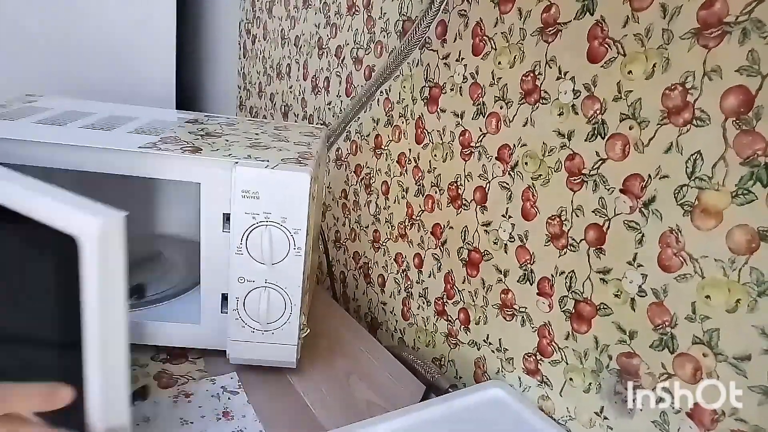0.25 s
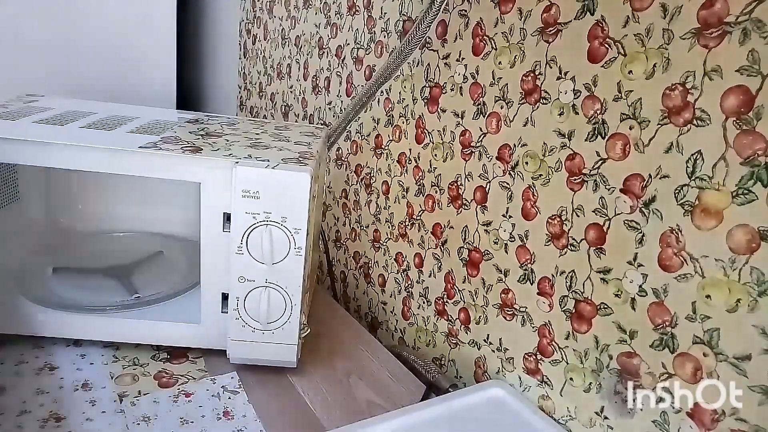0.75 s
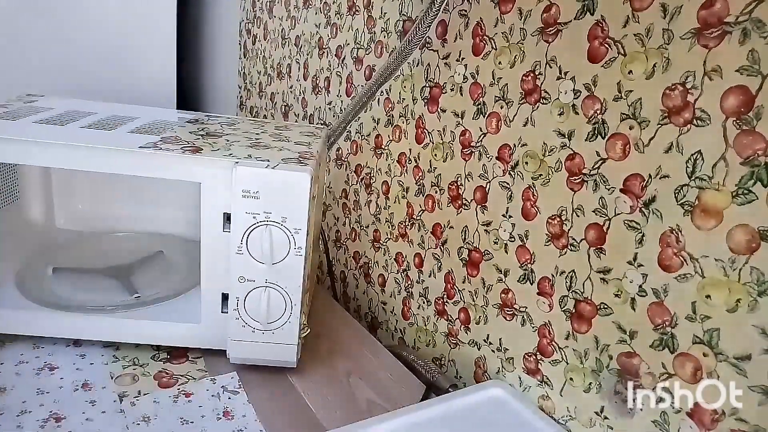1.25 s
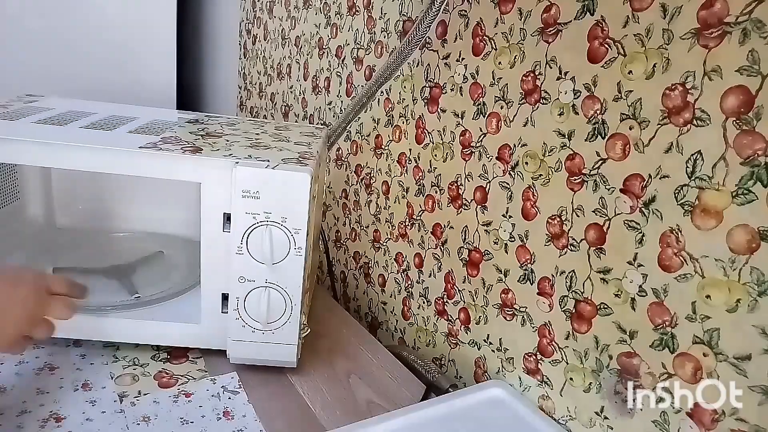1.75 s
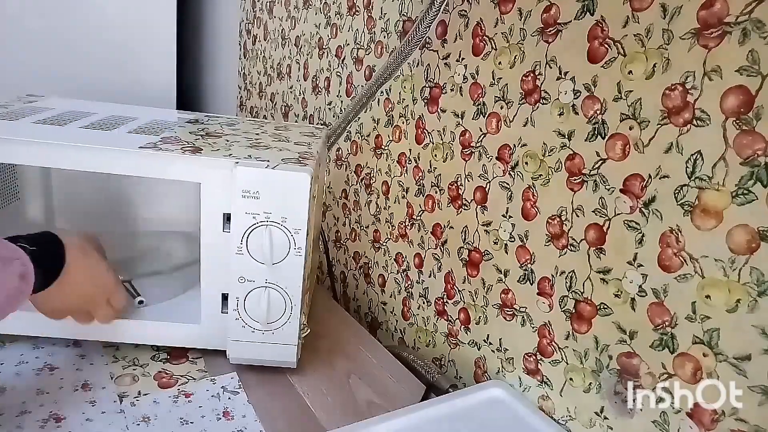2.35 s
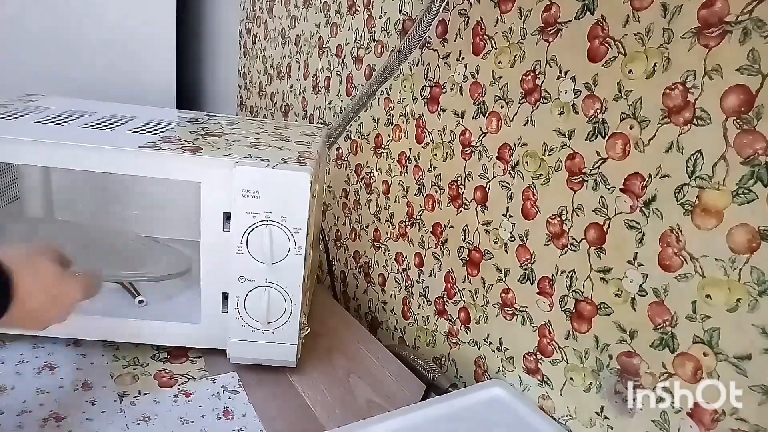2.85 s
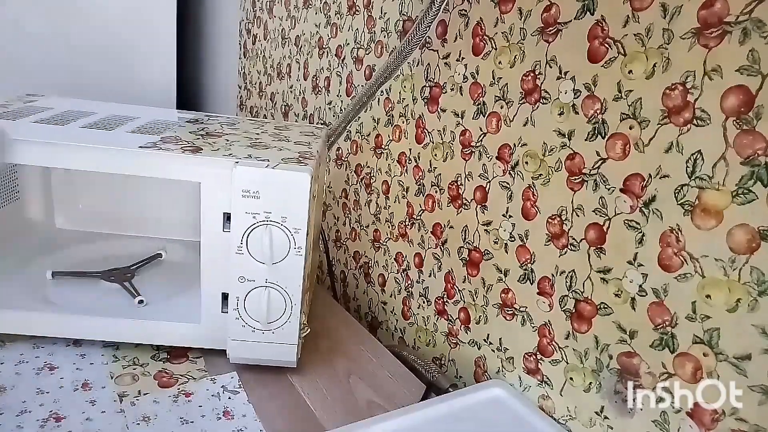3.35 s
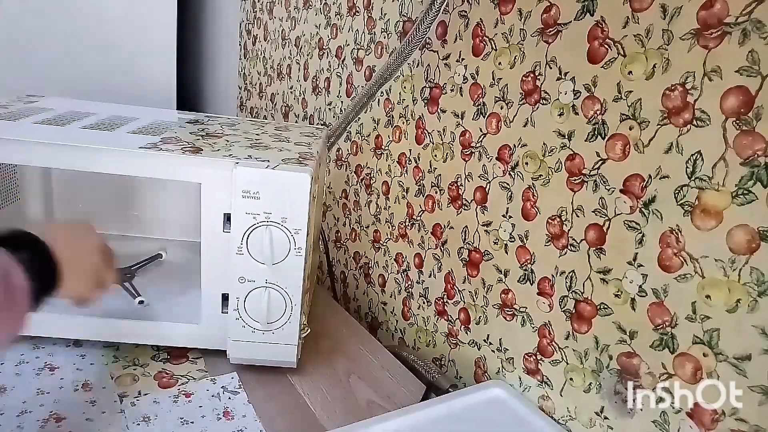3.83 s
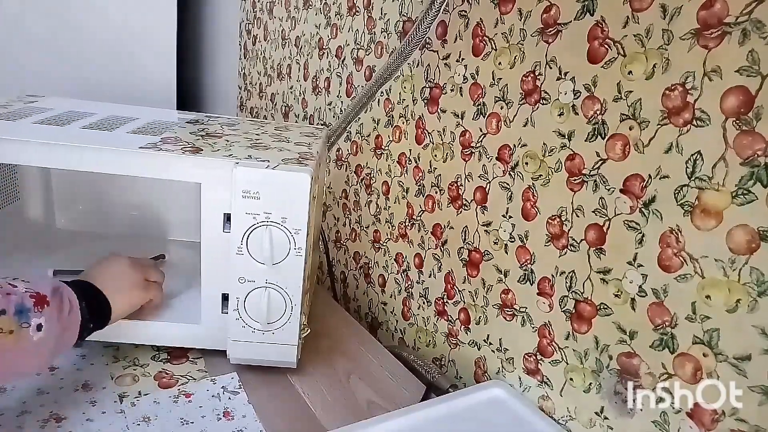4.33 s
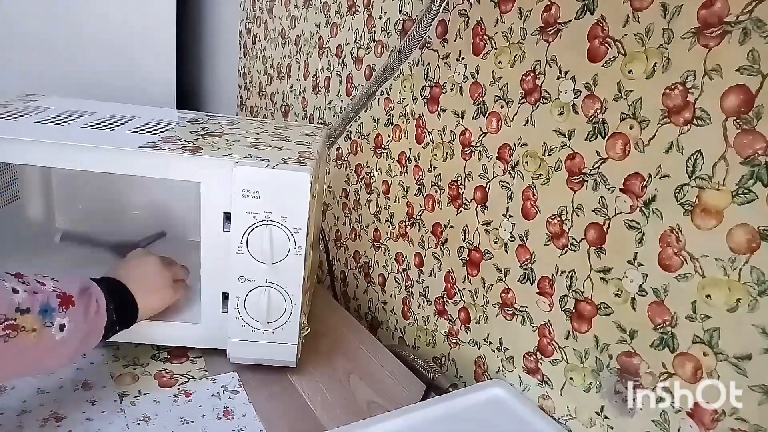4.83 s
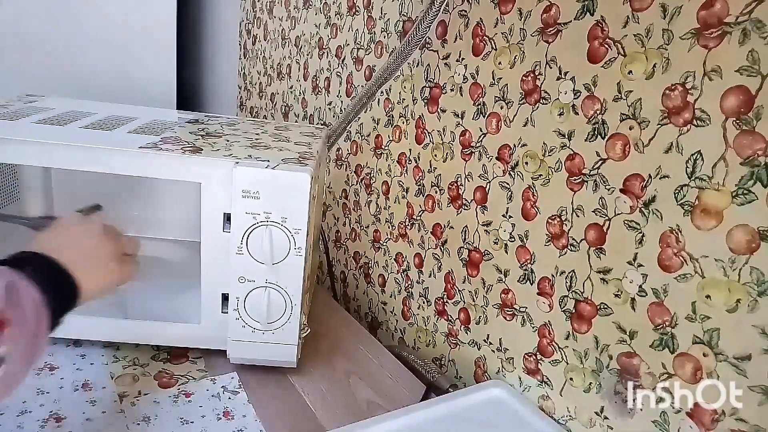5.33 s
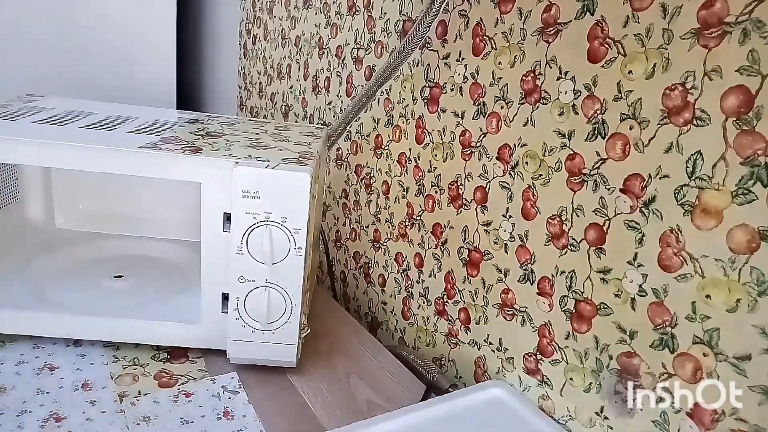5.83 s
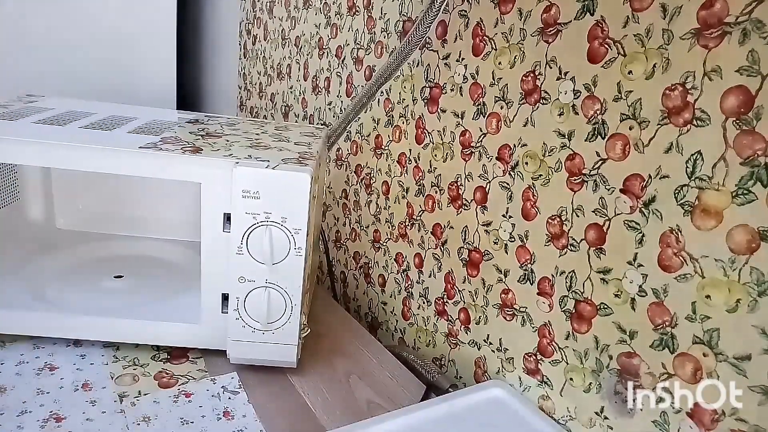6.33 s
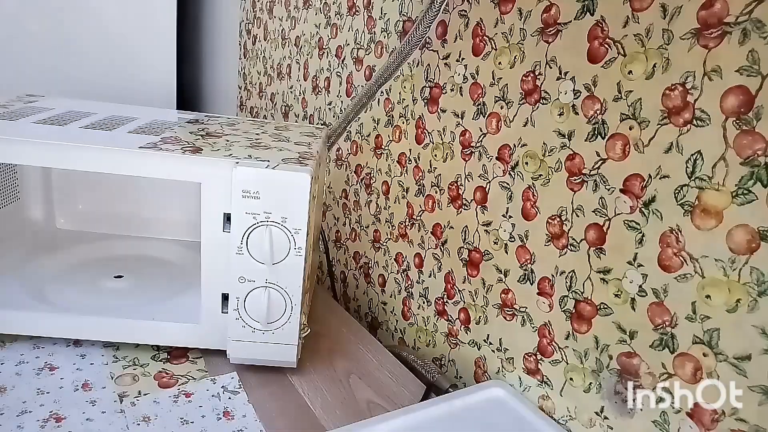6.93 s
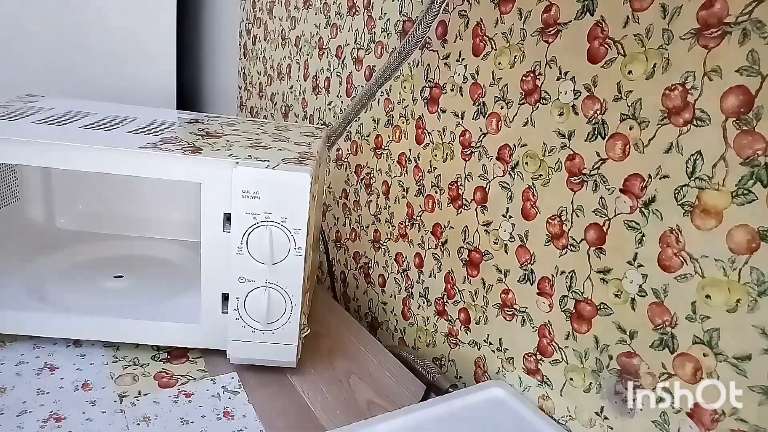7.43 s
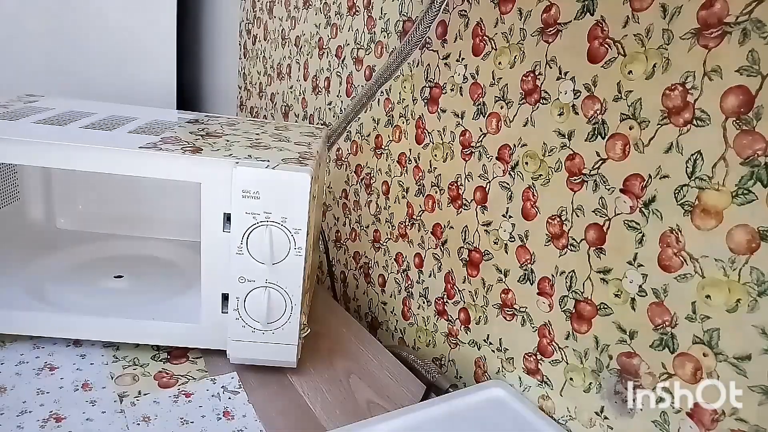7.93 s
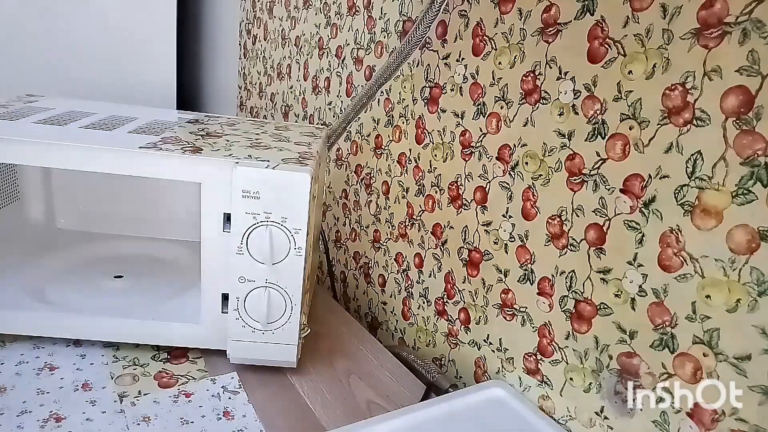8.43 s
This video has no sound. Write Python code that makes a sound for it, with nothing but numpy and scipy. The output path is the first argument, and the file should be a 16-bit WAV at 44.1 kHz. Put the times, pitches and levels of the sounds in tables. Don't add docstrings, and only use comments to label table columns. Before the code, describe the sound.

A small hard-walled kitchen with short bright reverberation, heard through a phone microphone; a soft low rumble and a wavering, droning distant wash run throughout. From 0 to 1.6 seconds there is faint rubbing on enamel and a few muffled low nudges. At about 2.0 to 2.7 a rapid burst of palm knocks hits the microwave oven casing, loudest near 2.25, with booming sheet metal, clatter and jingling glass. Quiet follows, with two barely audible glass touches near 3.5. A plastic roller ring rattles sharply at 4.1, then more lightly around 4.5 to 4.8, ending in tiny wheel ticks until 4.95. From 5.9 to 6.75 a hand-damped glass plate clinks against a dish, with a hissing scrape around 6.5. It clanks down hard at 7.05, rocks at 7.25, and settles with heavy knocks and ringing at 7.65 to 7.8. Faint rubbing and the wash remain until 8.7.

```python
import sys
import numpy as np
from scipy import signal
from scipy.fft import rfft, irfft, next_fast_len
from scipy.io import wavfile
from scipy.ndimage import uniform_filter1d, map_coordinates

SR = 44100
rng = np.random.default_rng(int(sys.argv[2]) if len(sys.argv) > 2 else 0)


def attenuation_scalar(level_db):
    decades = np.asarray(level_db, float) / 20
    return 10 ** decades


def generate_wav(sig):
    pcm = np.round(np.clip(np.atleast_2d(sig).T, -1, 1) * 32767).astype(np.int16)
    wavfile.write(sys.argv[1], SR, pcm)


N = 382347


# (frequency [Hz], level [dB], t60 [s])
CASING = [(100, -12.5, 0.12), (189, 2.5, 0.095), (243, 4, 0.085), (281, -8, 0.06), (360, -11, 0.08)]
# (frequency [Hz], density [dB per Hz])
PALM = [(180, -39), (320, -7.5), (492, -5.5), (806, -2), (940, -11), (1030, -3.5), (2770, -16.5),
        (3100, -16.5), (3350, -22.5), (4200, -14.5), (4900, -20.5), (6680, -23), (12000, -81),
        (15600, -100), (22000, -120)]
# (frequency [Hz], level [dB], t60 [s])
ROLLER = [(3104, 3.5, 0.031), (3520, -22, 0.036), (3900, -7.5, 0.026), (4096, 4, 0.019), (4300, -11, 0.038),
          (5430, -5.5, 0.041), (5700, 8.5, 0.024), (5850, -8, 0.073), (6200, 7.5, 0.027), (6780, 5, 0.02),
          (8010, -14, 0.051), (9400, -28, 0.058)]
# (frequency [Hz], level [dB], t60 [s])
TOP = [(7600, -23.5, 0.1), (7990, -18.5, 0.067), (8360, -27, 0.052), (8660, -31, .06), (9170, -21, 0.058),
       (9840, -23, 0.11), (10680, -25, 0.089), (11370, -27.5, 0.11), (11720, -38, .04), (12600, -39, .03),
       (13300, -38, .05), (14000, -39.5, 0.06), (15300, -37, .04)]
# (frequency [Hz], level [dB], t60 [s])
PLATE = [(2780, 2, 0.15), (2807, 2, 0.075), (2840, -3, 0.08), (3040, -3, 0.11), (3187, -8.5, 0.16)]
# (frequency [Hz], level [dB], t60 [s])
TAPPED = [(1092, 1.5, 0.086), (1070, -2, 0.11), (1594, -1.3, 0.35)]
# (level [dB], t60 [s])
HIGH_SET = [(-4, .1), (2.5, 0.096), (-4, 0.065), (-8.5, 0.091), (-13, .1), (-6, 0.041), (3, 0.065),
            (-7, .12), (-1, 0.057), (-14, 0.19), (-16, 0.11)]


def unit(x):
    return x / np.sqrt(np.mean(x ** 2) + 1e-20)


def along(points, hz):
    f, v = np.transpose(points)
    return np.interp(np.log(hz + 1), np.log(f + 1), v)


def curves(rows):
    s, *cols = np.transpose(rows)
    return [np.interp(np.arange(N) / SR, s, c) for c in cols]


def wobble(rate):
    knots = rng.standard_normal(int(N * rate / SR) + 4)
    return map_coordinates(knots, [np.arange(N) * rate / SR])


def coloured(x, spectrum, tilt_db=0):
    hz = np.fft.rfftfreq(len(x), 1 / SR)
    gain_db = along(spectrum, hz) + tilt_db * np.log2(hz / 1000 + 0.032)
    return unit(irfft(rfft(x) * attenuation_scalar(gain_db), len(x)))


def rush(spectrum, patchy_db):
    z = signal.stft(rng.standard_normal(next_fast_len(N + 4096)), nperseg=512)[2]
    field = uniform_filter1d(rng.standard_normal(z.shape), size=6, axis=0)
    field = uniform_filter1d(field, size=12, axis=1)
    patchy = signal.istft(z * attenuation_scalar(patchy_db * unit(field)), nperseg=512)[1]
    return coloured(patchy, spectrum)[:N]


def drone(peaks):
    size = next_fast_len(N)
    hz = np.fft.rfftfreq(size, 1 / SR)
    gain = sum(attenuation_scalar(db) / (1 + ((hz - centre_hz) / width_hz * 2) ** 2)
               for centre_hz, width_hz, db in peaks)
    return unit(irfft(rfft(rng.standard_normal(size)) * gain, size))[:N]


def ring(modes, t, scatter_db):
    hz, db, t60 = np.transpose(modes)[:, :, None]
    luck = rng.standard_normal((2, len(modes), 1))
    decay = np.exp(-np.log(1000) / t60 * t)
    tone = np.sin(2 * np.pi * hz * (1 + 0.001 * luck[1]) * t)
    return np.sum(attenuation_scalar(db + scatter_db * luck[0]) * decay * tone, axis=0)


def onset(t, rise_s):
    return 1 - np.exp(-t / rise_s)


def kitchen(direct, sent):
    # (frequency [Hz], t60 [s])
    room_t60 = [(150, 0.72), (1000, 0.47), (4000, 0.39), (9000, 0.23), (15000, 0.15)]
    hz, t, z = signal.stft(rng.standard_normal(SR // 2), SR, nperseg=256)
    fade_db = -60 * t / along(room_t60, hz)[:, None]
    tail = signal.istft(z * attenuation_scalar(fade_db), SR, nperseg=256)[1]
    tail *= onset(np.arange(len(tail)) / SR, 0.00054)
    wet = signal.fftconvolve(sent, tail / np.linalg.norm(tail))
    return np.pad(direct, (0, len(wet) - len(direct))) + wet


def add(track, s, sound):
    track[round(s * SR):][:len(sound)] += sound


def ambience():
    # (time [s], level [dB])
    below = [(0, -52), (.25, -64.5), (.75, -61), (1.1, -66), (1.9, -67), (3.2, -66.5), (4.0, -64.5),
             (5.0, -67.5), (5.4, -61.5), (6.1, -62.5), (6.9, -56), (8.1, -62), (8.67, -59)]
    # (time [s], level [dB], lean from wide to narrow drone [dB])
    distant = [(0, -45.5, -6.5), (.3, -48.5, -3.5), (1.2, -45, -2), (1.9, -47, -2), (2.9, -49, 4),
               (3.4, -49.5, 2), (4.0, -48, 2), (4.7, -43.5, 0.5), (5.2, -45, 2.5), (5.8, -43.5, 7.5),
               (6.3, -44.5, 2), (6.95, -48, -3), (7.5, -39.5, 7.5), (8.05, -48, 0.5), (8.67, -45, 2)]
    # (frequency [Hz], density [dB per Hz])
    rumble_spectrum = [(12, -48), (20, -28), (43, -14.5), (81, 0), (124, 2), (198, -3.5), (220, -7),
                       (361, -4), (450, -15.5), (580, -40), (990, -120)]
    wash_spectrum = [(150, -19.5), (250, -31), (467, -11), (672, -6), (1020, -3), (1070, -9), (1440, -4.5),
                     (2000, -8.5), (2650, -20.5), (3490, -41), (3880, -32), (5300, -73), (6870, -59),
                     (8030, -46), (15800, -45.5)]
    # (frequency [Hz], width [Hz], level [dB])
    wide_peaks = [(549, 86, 5), (650, 89, -4.5), (1136, 190, 4.5), (1280, 26, 9.5), (1650, 290, -3.5)]
    narrow_peaks = [(999.6, 16.5, 6.5), (1117, 290, -2.5), (1435, 27, -6.5)]
    (rumble_db,), (level_db, lean_db) = curves(below), curves(distant)
    rumble = unit(rush(rumble_spectrum, patchy_db=1.5) * attenuation_scalar(2 * wobble(8)))
    wash = unit(rush(wash_spectrum, patchy_db=1.2) * attenuation_scalar(0.5 * wobble(7)))
    wide = attenuation_scalar(-8 - lean_db) * drone(wide_peaks)
    narrow = attenuation_scalar(-7.5 + lean_db) * drone(narrow_peaks)
    return attenuation_scalar(rumble_db + 2) * rumble + attenuation_scalar(level_db) * (attenuation_scalar(-4) * wash + wide + narrow)


def rubbing():
    # (peak time [s], swell [s], fade [s], peak level [dB])
    strokes = [(0.02, 0.18, 0.44, -54), (.71, 0.18, 0.14, -47), (.9, 3, 1.1, -64.5),
               (1.27, 0.3, 0.3, -57.5), (1.52, 0.097, 0.13, -57), (2.039, 0.24, 0.14, -45.5),
               (3.55, 0.46, 1.3, -73.5), (4.78, 0.63, 1.13, -59), (5.75, 0.17, 2.2, -59),
               (6.68, 0.53, 0.31, -53), (7.52, 0.52, 0.47, -48), (8.4, 0.49, 1, -65)]
    # (frequency [Hz], density [dB per Hz])
    enamel = [(1060, -25), (1800, 2), (2010, -3.5), (2560, -1), (2720, -5.5), (3150, -3.5), (4350, -7),
              (6350, -5.5), (9880, -34.5), (15500, -39)]
    stroke_range_db, rest_db = 22, -75.5
    t = np.arange(N) / SR
    effort = attenuation_scalar(rest_db)
    for s, swell, fade, db in strokes:
        effort = effort + attenuation_scalar(db - stroke_range_db * np.maximum((s - t) / swell, (t - s) / fade))
    loose_parts = drone([(hz, 40, db / 3) for hz, db, _ in ROLLER[:-2]])
    singing = attenuation_scalar(-10 + 2.5 * wobble(7)) * loose_parts
    grain = attenuation_scalar(0.8 * wobble(60) + 0.8 * wobble(12))
    return effort * grain * (rush(enamel, patchy_db=2) + singing)


def dragging():
    # (frequency [Hz], density [dB per Hz])
    scrape = [(880, -20), (1500, -8), (1970, -11), (2360, -3), (2730, -2), (3420, -6), (3740, -5),
              (5940, -1), (8790, -22), (15700, -43)]
    start_s, attack_s, hold_s, release_s = 6.34, 0.15, 0.11, 0.18
    corners = start_s + np.cumsum([0, attack_s, hold_s, release_s])
    swell = np.interp(np.arange(N) / SR, corners, [0, 1, 1, 0]) ** 2
    return swell * attenuation_scalar(-40.5 + 0.79 * wobble(40)) * rush(scrape, patchy_db=1.0)


def blows(events, spectrum, loose, firm_tilt_db, tilt_per_db, contact, body, panel_db=-60):
    # (frequency [Hz], level [dB], t60 [s])
    panel = [(791, -2, .05), (1050, 0, .05), (1290, -3, .045), (1770, -5, .04), (2360, -7, .035),
             (2680, -11, .025), (2860, -13, .02), (3060, -13, .02), (4100, -15, .012), (4350, -15, .012)]
    firm_db = -10
    boom_lag = round(0.0039 * SR)
    track, t = np.zeros(N + 2 * SR), np.arange(10000) / SR
    for s, clatter_db, boom_db, jingle_db in events:
        bright_db = firm_tilt_db + tilt_per_db * (clatter_db - firm_db)
        grains = rng.standard_normal(len(t)) * attenuation_scalar(5.5 * rng.standard_normal(125).repeat(80))
        rattle = coloured(grains, spectrum, bright_db) * np.exp(-t / contact) * onset(t, 0.0017)
        boom_rise_s = 0.0082 * attenuation_scalar(-0.23 * (boom_db - firm_db))
        boom = attenuation_scalar(boom_db + 1.5) * ring(body, t, scatter_db=1.5) * onset(t, boom_rise_s)
        boom = np.pad(boom, (boom_lag, 0))[:len(t)]
        sharp = attenuation_scalar(clatter_db - 12.5) * rattle
        sharp += attenuation_scalar(jingle_db - 11) * ring(loose, t, scatter_db=1.8) * onset(t, 0.002)
        sharp += attenuation_scalar(clatter_db + panel_db) * ring(panel, t, scatter_db=3) * onset(t, 0.003)
        add(track, s, kitchen(sharp + boom, attenuation_scalar(2.0) * sharp + attenuation_scalar(-13) * boom))
    return track[:N]


def worktop_nudges():
    nudges = [
        (.43, -75, -47, -90),
        (.67, -75, -52, -90),
        (.76, -75, -51, -90),
        (.85, -75, -52, -90),
        (1.48, -75, -50, -90),
    ]
    # (frequency [Hz], level [dB], t60 [s])
    worktop = [(92, -2, 0.25), (132.2, 3, 0.26), (195.4, -4, 0.26)]
    return blows(nudges, PALM, TOP, firm_tilt_db=0, tilt_per_db=2, contact=0.02, body=worktop)


def casing_thumps():
    thumps = [(1.966, -35, -46, -70), (2.048, -31, -36.5, -48), (2.072, -23.5, -28.5, -49),
              (2.134, -14, -22.5, -49), (2.218, -8.5, -9, -27), (2.245, -3, -17, -19),
              (2.262, -8, -13, -34.5), (2.285, -8, -26, -45), (2.319, -13, -16, -47),
              (2.35, -16.5, -19, -47), (2.389, -29, -20, -58), (2.463, -11.5, -12.5, -35),
              (2.5, -20.5, -17.5, -48), (2.567, -14.5, -15.5, -38), (2.639, -33, -27.5, -30),
              (2.679, -35, -39, -70)]
    return blows(thumps, PALM, TOP, firm_tilt_db=1.5, tilt_per_db=0.0, contact=0.012, body=CASING,
                 panel_db=-24.5)


def roller_ring():
    knocks = [(3.698, -51.5, -73, -59), (4.006, -56, -60, -72), (4.088, -31, -70, -47),
              (4.099, -11.5, -31.5, -18), (4.118, -12.5, -33, -40), (4.148, -31, -36.5, -52),
              (4.23, -20.5, -37, -41), (4.519, -25, -39, -38.5), (4.545, -28, -31.5, -42),
              (4.644, -32, -39, -53), (4.778, -47, -35.5, -70), (4.799, -19.5, -32.5, -34),
              (5.673, -57, -70, -43), (5.696, -58, -69, -39.5)]
    ticks = [
        (4.806, -55, -57, -28),
        (4.825, -55, -60, -32),
        (4.845, -55, -58, -28),
        (4.868, -58, -63, -39),
        (4.914, -37, -73, -34),
        (4.96, -58, -70, -42),
    ]
    brushes = [
        (4.443, -36, -43.5, -41),
        (4.752, -42, -43, -43),
    ]
    # (frequency [Hz], level [dB], t60 [s])
    floor = [(107, -17, 0.083), (192, -2.5, 0.14), (234, 5, 0.13), (432, -14, 0.048), (542, -1.5, 0.064)]
    wheel = [(4100, -10, .03), (5870, 3, 0.039), (6060, 7.5, 0.031), (6900, -16, 0.027), (8100, -20, 0.041)]
    arm = [(4000, -10, .03), (5530, 0, 0.036), (5780, 0, .04), (6920, 1, 0.043), (7540, -15, 0.027)]
    # (frequency [Hz], density [dB per Hz])
    plastic = [(100, -1.5), (300, -0.5), (1000, 6), (3000, 2), (4500, 6), (6500, 0.5), (8000, -14),
               (11000, -20), (15500, -26)]
    rattling = blows(knocks, [(60, -32)] + plastic, ROLLER, firm_tilt_db=-0.26, tilt_per_db=0.16,
                     contact=0.013, body=floor)
    ticking = blows(ticks, plastic, wheel, firm_tilt_db=0.2, tilt_per_db=-1.7, contact=0.006, body=floor)
    brushing = blows(brushes, plastic, arm, firm_tilt_db=-7, tilt_per_db=0.1, contact=0.012, body=floor)
    return rattling + ticking + brushing


def rim_cracks():
    cracks = [
        (2.246, -14, -80, -80),
        (4.007, -42, -80, -80),
        (5.932, -20.5, -80, -80),
        (6.72, -16, -82, -80),
        (7.055, -9, -80, -80),
        (7.255, -11, -80, -80),
        (7.736, -16, -83, -82),
        (8.139, -36, -80, -80),
    ]
    # (frequency [Hz], density [dB per Hz])
    rim = [(800, -26.5), (2000, -10.5), (3000, -0.5), (5000, 5), (7000, -11), (9000, -24), (15500, -44)]
    return blows(cracks, rim, TOP[:1], firm_tilt_db=0.5, tilt_per_db=0.5, contact=0.004, body=CASING)


def plate_thuds():
    thuds = [
        (7.258, -17, -52, -75),
        (7.53, -18.5, -47, -74),
        (7.651, -8.5, -29, -70),
        (7.714, -15.5, -29, -70),
    ]
    return blows(thuds, PALM, TOP, firm_tilt_db=-4.5, tilt_per_db=-0.46, contact=0.0087, body=CASING)


def clinks(events, low_modes, plate_modes, low_over_db, edge_db, grip_db, contact, rim_db=0.0,
           high=HIGH_SET, rise=0.00082):
    # (frequency [Hz], level [dB], t60 [s])
    dish_modes = [(2357, 2, 0.55), (2372, -4.5, .3)]
    rim_modes = [(4021, 0, 0.4), (5992, -17, 0.25), (6670, -16, .15)]
    high_hz = [4100, 4202, 4345, 4520, 5500, 5700, 5815, 5985, 6215, 6660, 6955]
    # (frequency [Hz], density [dB per Hz])
    glass_clatter = [(100, 1), (200, -5.5), (400, 0.5), (1000, -9), (1700, 3), (2900, -5), (3500, -12.5),
                     (4200, 4.5), (5000, -25), (6000, -7.5), (8000, -34), (11000, -47), (15500, -71.5)]
    spark_spectrum = [(3000, -34), (6000, -4), (9000, -4), (15500, -8)]
    high_modes = np.column_stack([high_hz, high])
    track, t = np.zeros(N + 2 * SR), np.arange(14000) / SR
    attack = onset(t, rise)
    for s, clatter_db, dish_db, plate_db, high_db in events:
        clatter = coloured(rng.standard_normal(len(t)), [(55, -43.5)] + glass_clatter)
        clatter *= attenuation_scalar(clatter_db - 17.5) * np.exp(-t / contact) * attack
        spark = coloured(rng.standard_normal(len(t)), spark_spectrum) * np.exp(-t / 0.016) * attack
        clatter += attenuation_scalar(high_db + edge_db - 38) * spark
        dish = ring(dish_modes, t, scatter_db=0.5) + attenuation_scalar(rim_db) * ring(rim_modes, t, scatter_db=1.5)
        dish *= attenuation_scalar(dish_db - 0.78 * grip_db * t) * attack
        low = attenuation_scalar(clatter_db + low_over_db) * ring(low_modes, t, scatter_db=1.0)
        low *= onset(t, 0.0072)
        held = attenuation_scalar(plate_db - 7.5) * ring(plate_modes, t, scatter_db=1.5)
        held += attenuation_scalar(high_db - 5.5) * ring(high_modes, t, scatter_db=1.8)
        held += attenuation_scalar(high_db + edge_db - 4.0) * ring(TOP, t, scatter_db=4)
        held = (held * attack + low) * attenuation_scalar(-grip_db * t)
        sent = attenuation_scalar(1.0) * clatter + attenuation_scalar(-2.5) * held + attenuation_scalar(-13) * dish
        add(track, s, kitchen(clatter + held + dish, sent))
    return track[:N]


def plate_aside():
    aside = [
        (3.515, -62, -67, -75, -65),
        (3.545, -64, -73, -75, -65),
    ]
    return clinks(aside, TAPPED[:2], PLATE[:2], low_over_db=-20, edge_db=1, grip_db=40, contact=0.004)


def plate_taps():
    firm_taps = [
        (5.932, -26, -49, -58, -39),
        (5.956, -31, -45, -25.5, -25),
        (5.964, -29, -50, -28, -38),
        (6.005, -27, -48, -48, -29),
        (6.011, -18.5, -38, -45, -24),
        (6.097, -23, -43, -22.5, -26.5),
        (6.116, -17, -44.5, -59, -33),
        (6.232, -30, -56, -25.5, -32.5),
        (6.264, -26, -64, -56, -36.5),
        (6.377, -40, -51.5, -70, -60),
    ]
    shifted_taps = [
        (6.47, -20.5, -53, -30, -27),
        (6.555, -21.5, -56, -29.5, -28),
        (6.721, -18.5, -55, -23, -18),
        (6.749, -23.5, -42.5, -33, -25.5),
        (6.953, -51, -71, -53.5, -49),
    ]
    # (level [dB], t60 [s])
    high_firm = [(-10, .08), (4, .13), (-7, .09), (-18, .06), (-14, .05), (-12, .04), (2, .11), (-4, .035),
                 (-4, .05), (-14, .18), (-11, .07)]
    high_shifted = [(-9, .14), (4, .09), (4, .08), (-20, .08), (-16, .08), (-3, .05), (1, .06), (-8, .08),
                    (-3, .08), (-11, .1), (-7, .08)]
    firm = clinks(firm_taps, TAPPED, PLATE[:1], low_over_db=-17.0, edge_db=-3.0, grip_db=74,
                  contact=0.0028, high=high_firm, rise=0.0009)
    shifted = clinks(shifted_taps, TAPPED[:2], PLATE[:1], low_over_db=-12.5, edge_db=2.5, grip_db=110,
                     contact=0.0045, high=high_shifted, rise=0.0017)
    return firm + shifted


def plate_set_down():
    clanks = [(7.024, -29, -41, -24.5, -18.5), (7.055, -7.5, -19, -10, -18.5),
              (7.099, -13.5, -38, -18, -25.5), (7.134, -16.5, -26.5, -25, -30),
              (7.256, -9, -17.5, -19.5, -27.5), (7.284, -6.5, -39, -31, -24),
              (7.315, -6, -29.5, -21.5, -33), (7.511, -20, -57, -52, -44), (7.533, -15.5, -61, -48, -52),
              (7.546, -22, -30.5, -44, -38), (7.649, -6.5, -39, -17.5, -29), (7.678, -12.5, -35, -40, -32),
              (7.712, -4, -58, -15, -45), (7.735, -9, -45, -17.5, -25.5), (7.752, -14, -45, -34, -37),
              (7.769, -15, -60, -39, -30.5), (7.783, -16.5, -54, -34, -37), (7.799, -21, -42, -24.5, -55)]
    # (frequency [Hz], level [dB], t60 [s])
    low_first = [(371, -8.5, 0.04), (452, -22.5, 0.14), (725, -12.5, 0.071), (804, -5.5, 0.07),
                 (926, -5.5, 0.14), (1017, 1.5, 0.065), (1077, 4, 0.12), (2070, -3, 0.1)]
    low_second = [(366, -14.5, 0.28), (433, -14, 0.3), (734, -4, 0.039), (818, -5.5, 0.12),
                  (919, -1.5, 0.11), (1042, 8, 0.054), (1059.4, -2, 0.11), (1580, -21, 0.088),
                  (2130, -10, 0.11)]
    low_last = [(367, -5, 0.066), (460, -9, 0.098), (695, -3, 0.058), (815, -1.5, 0.096), (920, -4.5, 0.36),
                (980, 5.5, 0.054), (1080, -5.5, 0.31), (1150, -5, 0.095), (1400, -8.5, 0.12),
                (1666, -8, 0.1), (1765, -11, 0.086), (2120, -12, 0.08)]
    # (frequency [Hz], level [dB], t60 [s])
    rocked = [(2767, 5, 0.16), (2830, 8, 0.11), (2870, -2, .06), (3140, 2.5, 0.12), (3220, 4.5, 0.071)]
    settled = [(2784, -4, .26), (2815, 0, 0.3), (2896, -14, .06), (2977, -14, .1), (3100, -14, 0.08)]
    landing = clinks(clanks[:4], low_first, PLATE, low_over_db=-9, edge_db=1.5, grip_db=38,
                     contact=0.011, rim_db=-10.5)
    rocking = clinks(clanks[4:7], low_second, rocked, low_over_db=-10.0, edge_db=2, grip_db=22,
                     contact=0.0087, rim_db=-7)
    edge = clinks(clanks[7:10], low_second, rocked, low_over_db=-13.0, edge_db=13.0, grip_db=13,
                  contact=0.0069, rim_db=3.0)
    settling = clinks(clanks[10:], low_last, settled, low_over_db=-13, edge_db=0.5, grip_db=17,
                      contact=0.0082, rim_db=-2)
    return landing + rocking + edge + settling


def scene():
    handling = rubbing() + dragging() + worktop_nudges()
    oven = casing_thumps() + roller_ring()
    glass = rim_cracks() + plate_thuds() + plate_aside() + plate_taps() + plate_set_down()
    return (ambience() + handling + oven + glass)[None]


def roll_off(x):
    return signal.sosfilt(signal.butter(12, 15990, fs=SR, output="sos"), x)


def record(dry):
    low_cut = signal.butter(1, 45, "high", fs=SR, output="sos")
    size = next_fast_len(N)
    below_top = np.fft.rfftfreq(size, 1 / SR) < 15700
    kept = irfft(rfft(signal.sosfilt(low_cut, dry), size) * below_top, size)[:, :N]
    return roll_off(kept)


dry = scene()
out = record(dry)
generate_wav(out)
```